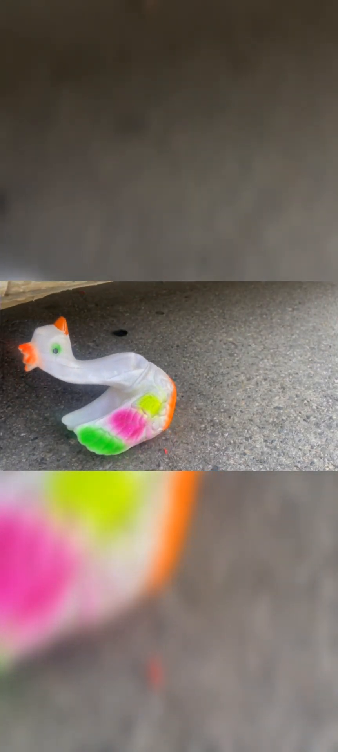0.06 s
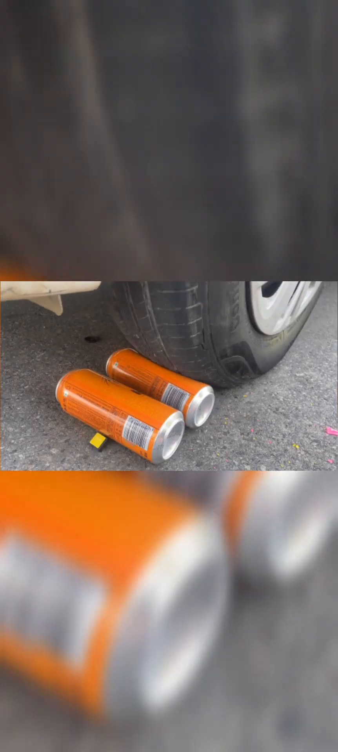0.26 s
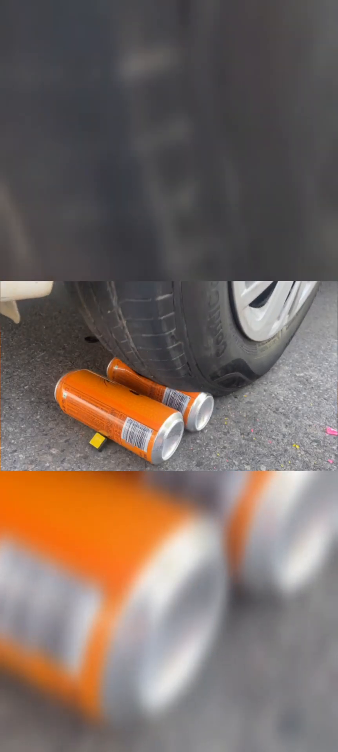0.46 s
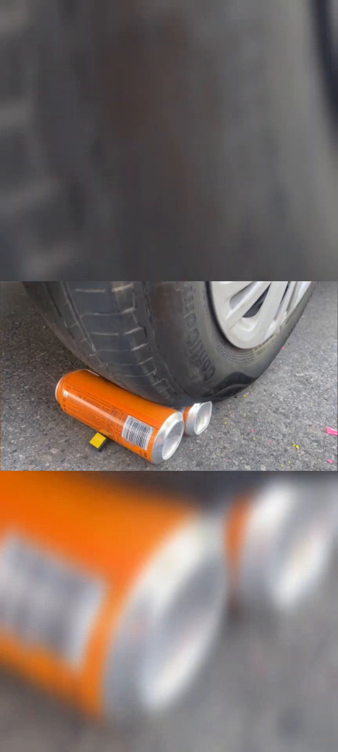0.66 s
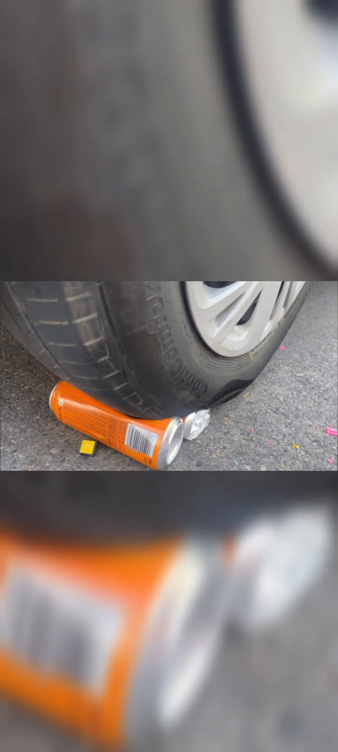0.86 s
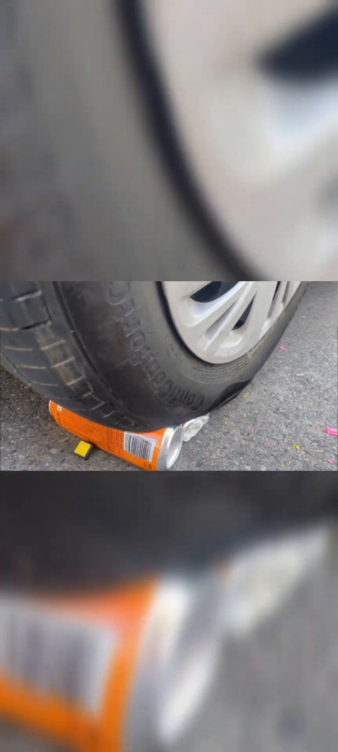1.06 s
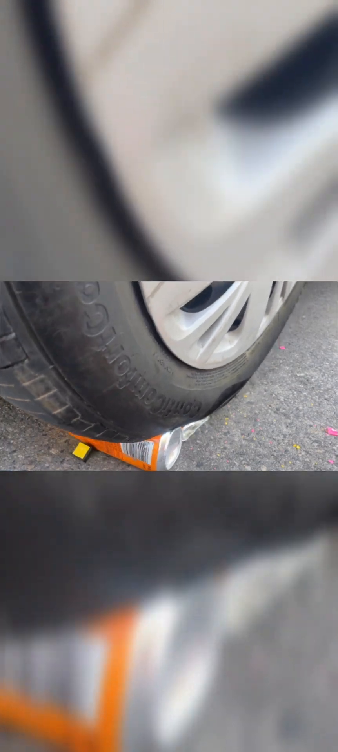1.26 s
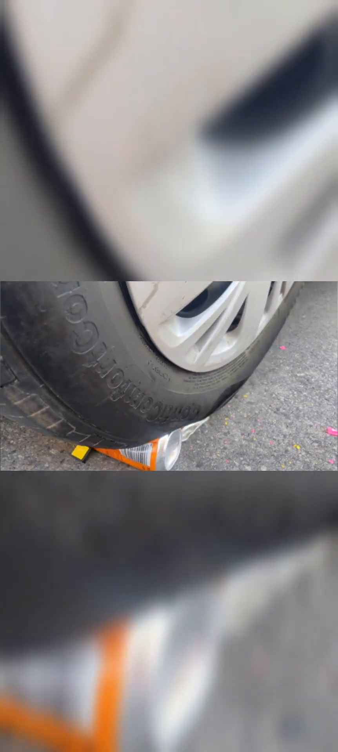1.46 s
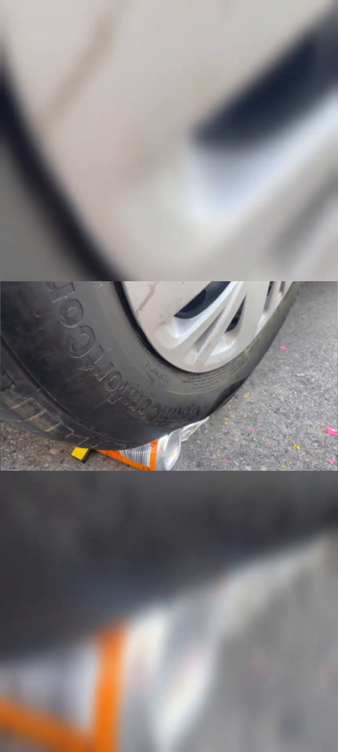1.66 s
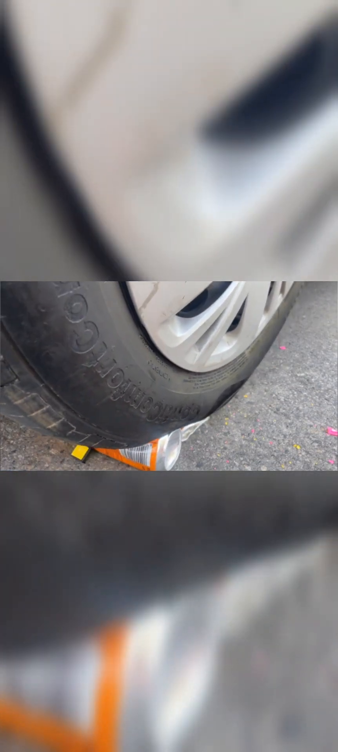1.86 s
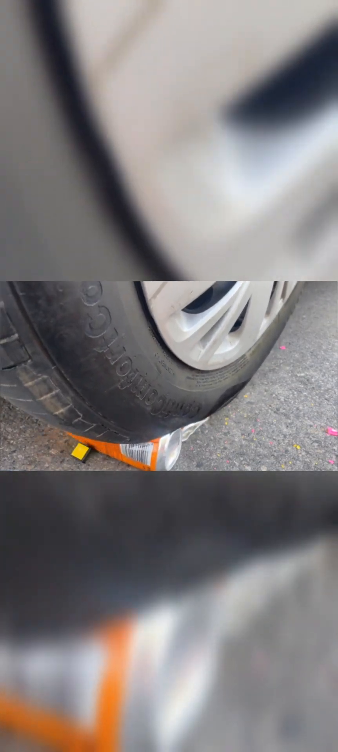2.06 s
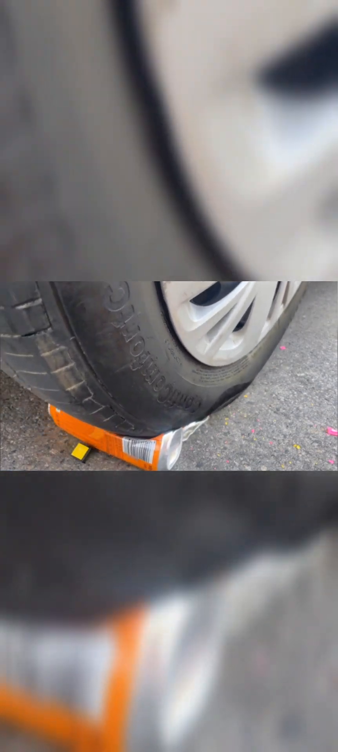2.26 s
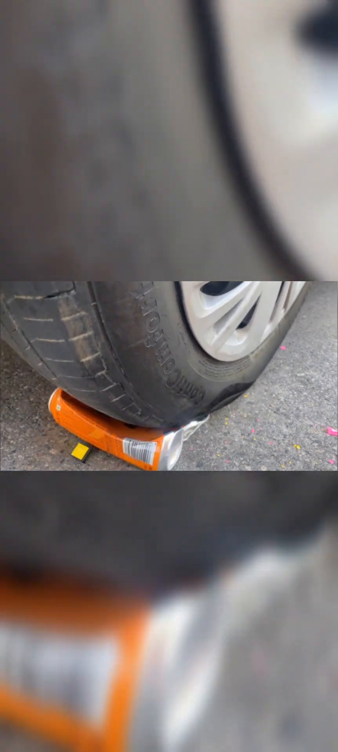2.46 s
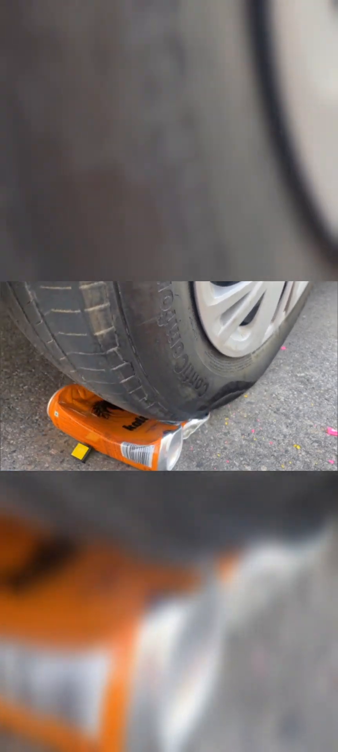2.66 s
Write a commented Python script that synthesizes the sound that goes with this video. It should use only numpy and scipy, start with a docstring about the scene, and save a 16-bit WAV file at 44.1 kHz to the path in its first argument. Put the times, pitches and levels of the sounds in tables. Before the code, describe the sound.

Close up outdoors on asphalt, thin metal cans snap and crinkle as a tyre rolls on, nearly fall silent over a low idling engine, then crunch again with bright pings as it rolls back.

```python
"""Sharp snaps and crunches of aluminium, with fine crinkling between them: a car creeps over two empty
cans on asphalt, its engine idling, the microphone close by. Runs of noise-like slips ring the modes of
the dented cans; single panels pop and stiff creases ping. The tyre thumps dully as soft pushes ring its
modes. Two wandering sines make the idle, over coloured noise for exhaust rumble and open air; a faint
tail of dying noise is the echo from car body and yard."""
import sys
import numpy as np
from scipy import signal
from scipy.fft import rfft, irfft
from scipy.io import wavfile

SR = 44100
rng = np.random.default_rng(int(sys.argv[2]) if len(sys.argv) > 2 else 0)


def unload_audio(sound):
    """Save the sound as a 16-bit wav file, at the path given as the first command line argument."""
    columns = np.transpose(np.atleast_2d(sound))
    # keep every value between -1 and 1, then stretch to whole-number steps
    steps = np.round(np.clip(columns, -1, 1) * 32767)
    wavfile.write(sys.argv[1], SR, steps.astype(np.int16))


N = 121275
LEAD_S = 0.015  # a run of slips starts this long before its main onset
SHEET_DB = -26  # ring of the crumpled sheet against the direct click


def amp(db):
    """Decibels to gain."""
    return 10 ** (np.asarray(db) / 20)


def unit(x):
    """Scales to an rms of one."""
    return x / np.sqrt(np.mean(x ** 2) + 1e-20)


def read(points, hz):
    """Reads a table on a log-frequency axis."""
    f, value = np.transpose(points)
    return np.interp(np.log(hz + 1), np.log(f + 1), value)


def add(mix, s, sound):
    """Mixes a sound in at a time in seconds."""
    part = mix[..., round(s * SR):][..., :sound.shape[-1]]
    part += sound[..., :part.shape[-1]]


def convolve(x, response):
    """Convolves along time and keeps the length."""
    full = signal.fftconvolve(np.atleast_2d(x), np.atleast_2d(response), axes=1)
    return full[:, :x.shape[-1]]


def causal(points, size=2048):
    """Minimum-phase impulse response: a given colour with no sound ahead of its onset."""
    hz = abs(np.fft.fftfreq(size, 1 / SR))
    log_gain = np.log(amp(read(points, hz)))
    return np.fft.ifft(np.exp(np.conj(signal.hilbert(log_gain)))).real


def pair(size, shape=1):
    """Left and right noise under one envelope: alike in the bass, partly different higher up."""
    apart, apart_above_hz = 0.38, 650  # gain of the left-right difference, and where it begins
    both, side = rng.standard_normal((2, size)) * shape
    high_pass = signal.butter(1, apart_above_hz, "high", fs=SR, output="sos")
    side = apart * signal.sosfilt(high_pass, side)
    return unit(np.array([both + side, both - side]))


def dying(noise, t60, size=128):
    """Lets each band of a noise die at its own speed."""
    hz, t, bands = signal.stft(noise, SR, nperseg=size)
    fade = amp(-60 * t / read(t60, hz)[:, None])
    return signal.istft(bands * fade, SR, nperseg=size)[1][:, :noise.shape[1]]


def engine():
    """A slightly unsteady idle: sines at multiples of a wandering firing rate, over rumble and open air."""
    # engine orders [multiple of the firing rate, level/dB]
    orders = [(2, -41), (3, -54.5)]
    # colour of exhaust rumble and outdoor air [f/Hz, level/dB]
    air_colour = [(20, -13.5), (45, -5), (80, 7), (125, -2), (300, -20), (700, -31.5), (5000, -56.5),
                  (16000, -61.5)]
    firing_hz, idle_wander = 40.3, 0.018  # mean rate; rms wander as a share of it
    air_db = -44  # rms
    t = np.arange(N) / SR
    wander = unit(sum(np.sin(2 * np.pi * (f * t + rng.random())) for f in np.geomspace(.7, 12, 20)))
    turns = np.cumsum(firing_hz * (1 + idle_wander * wander)) / SR
    hum = sum(amp(db) * np.sin(2 * np.pi * (order * turns + rng.random())) for order, db in orders)
    air = unit(convolve(pair(N), causal(air_colour, size=8192)))
    return hum + amp(air_db) * air


def yard(x):
    """Faint, diffuse echo from car body and yard: a noise tail whose treble dies sooner."""
    # decay of the echo [f/Hz, t60/s]
    yard_t60 = [(200, 0.43), (12000, 0.069)]
    yard_db = -26
    tail = dying(rng.standard_normal((2, SR // 2)), yard_t60)
    return amp(yard_db) * convolve(x, tail / np.linalg.norm(tail[0]))


def tyre():
    """Soft pushes ring the modes of tyre and wheel; the air in the tyre hums from a set time."""
    # the tyre drops onto a collapsing can [t/s, level/dB, push length/s]
    thumps = [(0.807, -25.5, 0.0019), (0.84, -18.5, 0.0037), (1.747, -24, 0.0049), (1.756, -25, 0.00365),
              (1.765, -20.5, 0.0052)]
    # modes of tyre and wheel [f/Hz, level/dB, t60/s]
    tyre_modes = [(96.2, 1.5, 0.13), (175, -0.5, 0.16), (204.7, 10.5, 0.05), (285.6, -4.5, 0.2)]
    low_hz = 60  # the tyre radiates little below this
    cavity_s, cavity_hz, cavity_db, cavity_t60 = 0.93, 243, -44.5, 2.26  # onset, pitch, level, decay in s
    t, pushes = np.arange(N) / SR, np.zeros(N)
    for s, db, length in thumps:
        push = np.sin(np.pi * np.arange(0, length, 1 / SR) / length)
        add(pushes, s, amp(db) * push / push.sum())
    ring = sum(amp(db - 60 * t / t60) * np.cos(2 * np.pi * hz * t) for hz, db, t60 in tyre_modes)
    high_pass = signal.butter(2, low_hz, "high", fs=SR, output="sos")
    out = signal.sosfilt(high_pass, convolve(pushes, ring))
    cavity = amp(cavity_db - 60 * t / cavity_t60) * np.sin(2 * np.pi * cavity_hz * t)
    add(out, cavity_s, cavity)
    return out


def can_response(sheet_db, modes_db, size=6000):
    """Direct click, dense ring of the sheet and the can's modes, randomly retuned at every call."""
    # modes of a dented can [f/Hz, level/dB, t60/s]
    can_modes = [(330.2, -6.5, 0.069), (491, -13.5, 0.039), (725.7, 0.5, 0.068), (902, -15, 0.11),
                 (1115, -10.5, 0.04), (1444, -1, 0.02), (1613, -9.5, 0.076), (2440, -21, 0.095)]
    # decay of the crumpled sheet's dense ring [f/Hz, t60/s]
    sheet_t60 = [(300, 0.082), (3000, 0.064), (14000, 0.031)]
    detune = 0.018  # spread of a mode's pitch, as a share of it
    t = np.arange(size) / SR
    out = amp(sheet_db) * dying(pair(size), sheet_t60)
    for (hz, db, t60), dent in zip(can_modes, rng.standard_normal(len(can_modes))):
        mode_hz = hz * (1 + detune * dent)
        out += amp(modes_db + db - 60 * t / t60) * np.cos(2 * np.pi * mode_hz * t)
    out[:, 0] += 1  # direct click
    return out


def dented(x, size=4096):
    """Rings the can in overlapping stretches, each tuned anew, so its resonances shift as it deforms."""
    modes_db = -36
    out, window = np.zeros((2, N)), signal.get_window("hann", size)
    padded = np.pad(x, (0, size))
    for at in range(0, N, size // 2):
        part = padded[at:at + size] * window
        add(out, at / SR, signal.fftconvolve(part[None], can_response(SHEET_DB, modes_db), axes=1))
    return out


def crinkle(count=28, size=1024):
    """Clumps of tiny slips, each ringing one small facet of the wall and, through it, the can."""
    # fine crinkling and scraping as the cans are dragged [t/s, level/dB]
    crinkle_levels = [(.12, -60.5), (.132, -26.5), (.21, -35), (.265, -44), (.42, -28.5), (.47, -29.5),
                      (.73, -40.5), (.87, -33.5), (.945, -51), (1, -44), (1.42, -58.5), (1.58, -84.5),
                      (1.735, -81), (1.746, -52), (1.785, -70), (1.825, -56), (1.87, -70), (2, -61),
                      (2.17, -38.5), (2.26, -47.5), (2.37, -34), (2.42, -49), (2.465, -41.5),
                      (2.485, -25.5), (2.525, -30.5), (2.56, -37.5), (2.75, -58)]
    # colour of the crinkling [f/Hz, level/dB]
    crinkle_colour = [(60, -7.5), (260, 12.5), (520, -2), (820, 7), (2000, -3), (5000, -8.5),
                      (12500, -24.5), (15000, -28)]
    slips_per_s, spread_db = 7000, 4.5  # over all facets; scale of the random boost of a slip
    clump_db, clump_hz = 5, 68.7  # rms swing of the clumps, and their fastest rate
    low_hz, high_hz, decay_cycles = 378, 13660, 2.2  # pitch range of the facets; decay to 1/e
    t, facets = np.arange(N) / SR, np.zeros(N)
    low_pass = signal.butter(2, clump_hz, fs=SR, output="sos")
    clumps = amp(clump_db * unit(signal.sosfilt(low_pass, rng.standard_normal(N))))
    steps = (np.arange(count) + rng.random(count)) / count
    for hz in low_hz * (high_hz / low_hz) ** steps:
        cycles = hz * t[:size]
        ring = np.cos(2 * np.pi * cycles) * np.exp(-cycles / decay_cycles) * hz / SR
        slips = (rng.random(N) < slips_per_s / count / SR) * clumps
        at = np.flatnonzero(slips)
        slips[at] *= amp(-spread_db * np.log(np.maximum(rng.random(len(at)), .03)))  # rare loud slips
        facets += signal.oaconvolve(slips, ring)[:N]
    out = convolve(dented(facets), causal(crinkle_colour))
    return unit(out) * amp(np.interp(t, *np.transpose(crinkle_levels)))


def slip_run(length_ms, size=6000):
    """A run of slips rings the can; a few faint ones lead up to it. It begins LEAD_S early."""
    # colour of one slip of the metal [f/Hz, level/dB]
    slip_colour = [(50, -40.5), (140, -2.5), (300, 5.5), (560, 8), (740, 14.5), (1800, 3), (4500, 2.5),
                   (6500, 2), (12000, -5.5), (15500, -21.5)]
    rise_share, decay_shape = 0.1, 1.08  # longer runs also build up more slowly; exponent of the decay
    lead_db = -23.5  # the metal starts to crackle just before it folds
    spread_db, modes_db = 6, -40
    snap_ms = 0.9  # runs shorter than this are mostly one clean snap
    progress = (np.arange(size) / SR - LEAD_S) * 1000 / length_ms  # in run lengths from the onset
    after = np.maximum(progress, 0)
    run = np.minimum(after / rise_share, 1) * np.exp(-after ** decay_shape)
    run += amp(lead_db) * np.exp(-abs(progress))
    slips = pair(size, run * amp(spread_db * rng.standard_normal(size)))
    slips[:, round(LEAD_S * SR)] += np.sqrt(size) * snap_ms / length_ms
    return convolve(convolve(slips, can_response(SHEET_DB, modes_db)), causal(slip_colour))


def tick():
    """One small crease gives way in a short run of slips; peak of one."""
    sound = slip_run(length_ms=2.5)
    return sound / abs(sound).max()


def ticks():
    """Small creases tick between the buckles."""
    # light ticks [t/s, peak level/dB]
    tick_times = [(0.336, -16), (0.365, -17), (0.881, -23.5), (0.998, -16), (1.051, -19), (1.1758, -13.5),
                  (1.2561, -16), (1.388, -27), (1.978, -37), (2.139, -20.5), (2.234, -26), (2.507, -20.5),
                  (2.287, -20)]
    out = np.zeros((2, N))
    for s, db in tick_times:
        add(out, s - LEAD_S, amp(db) * tick())
    return out


def pings(size=1500):
    """Stiff creases snap with a bright ping: a narrow cluster of sines that swells and dies quickly."""
    # bright pings [t/s, level/dB]
    ping_times = [(1.299, -10), (1.329, -2.5), (2.2876, -10.5), (2.474, -1)]
    centre_hz, width_hz, swell_s = 6040, 2800, 0.0003
    out, t = np.zeros(N), np.arange(size) / SR
    for s, db in ping_times:
        hz = centre_hz + width_hz * (rng.random((6, 1)) - .5)
        cluster = np.sin(2 * np.pi * hz * t).mean(0)
        envelope = t / swell_s * np.exp(1 - t / swell_s)
        add(out, s, amp(db) * cluster * envelope)
    return out


def pops():
    """A panel flips through with a tick and a hollow ring, its pitch sinking as it settles."""
    # panels of the wall flipping through [t/s, level/dB, settled f/Hz]
    panels = [(0.2835, -9, 745), (0.407, -8.5, 650), (0.38, -17, 312), (0.489, -16, 710), (2.44, -25, 720)]
    glide, settle_s, t60 = 0.14, 0.0051, 0.088  # initial rise as a share of pitch; settling and decay in s
    tick_db = -3  # tick against ring
    out, t = np.zeros((2, N)), np.arange(SR // 2) / SR
    for s, db, hz in panels:
        turns = np.cumsum(hz * (1 + glide * np.exp(-t / settle_s))) / SR
        add(out, s, amp(db - 60 * t / t60) * np.sin(2 * np.pi * turns))
        add(out, s - LEAD_S, amp(db + tick_db) * tick())
    return out


def buckle(length_ms, levels_db, count=2):
    """A stretch of wall folds in a run of slips, each band trimmed towards its level over 10 ms."""
    # low, body, crack and treble bands [from f/Hz, to f/Hz]
    bands = [(200, 550), (550, 1400), (1400, 4200), (4200, 16000)]
    sound = slip_run(length_ms)
    size = sound.shape[1]
    hz = np.fft.rfftfreq(size, 1 / SR)
    for _ in range(count):
        power = (abs(rfft(sound)) ** 2).mean(0) * 2 / size / (SR / 100)  # energy spread over 10 ms
        trim = []
        for (low, high), db in zip(bands, levels_db):
            band_power = power[(hz >= low) & (hz < high)].sum()
            trim.append((np.sqrt(low * high), db - 10 * np.log10(band_power)))
        sound = convolve(sound, causal(trim))
    return sound


def buckles():
    """All the snaps and crunches of the two cans as their walls buckle."""
    # buckles of the can wall
    # [t/s, length/ms, low level/dB, body level/dB, crack level/dB, treble level/dB]
    folds = [(0.208, 12, -30.5, -27.5, -26, -40.5), (0.2396, 1.3, -45, -25, -20.5, -43),
             (0.2912, 6.1, -45, -13.5, -19, -27.5), (0.3031, 5.7, -29.5, -17, -17.5, -34.5),
             (0.3515, 0.74, -31.5, -28, -20, -30), (0.385, 2.8, -20.5, -19, -19, -28.5),
             (0.4056, 9.7, -27, -14.5, -20.5, -24), (0.4182, 2.8, -39, -18, -15, -35.5),
             (0.371, 3.4, -22.5, -26, -43, -48), (0.567, 1.9, -36, -24.5, -23.5, -47),
             (0.4953, 4.1, -23, -26.5, -28, -31), (0.528, 1.9, -29.5, -24.5, -32, -31.5),
             (0.5605, 1.8, -38, -32, -28.5, -29.5), (0.5746, 2.1, -24.5, -21.5, -21.5, -29.5),
             (0.598, 3.4, -54, -31.5, -24, -20), (0.6068, 3, -33.5, -23.5, -19, -31.5),
             (0.616, 9.9, -20.5, -18, -25.5, -16.5), (0.6315, 2.1, -21.5, -26, -18, -26.5),
             (0.6811, 5.4, -20, -19, -21.5, -24), (0.7497, 3.1, -34.5, -26, -26.5, -33),
             (0.7938, 0.82, -22, -25.5, -34.5, -37.5), (0.8109, 4, -14, -16, -22.5, -31.5),
             (0.8385, 6.2, -15.5, -14, -14, -23.5), (0.9183, 9.6, -40.5, -43, -37, -33),
             (0.965, 1.9, -59, -28, -23, -27), (0.975, 4.2, -25, -29, -24.5, -38),
             (0.9902, 0.79, -33, -34.5, -26, -41), (1.0354, 0.84, -49, -31.5, -33.5, -29),
             (1.086, 8.2, -26.5, -29, -32.5, -43), (1.0964, 8.5, -37, -28, -28.5, -29.5),
             (1.1488, 1.9, -41.5, -28.5, -37, -46), (1.1983, 1.5, -42, -34, -27, -27),
             (1.2336, 3.1, -38.5, -24.5, -30, -33.5), (1.2987, 0.91, -43.5, -32.5, -22, -23.5),
             (1.329, 0.75, -48.5, -39, -43, -32), (1.3733, 5.4, -39.5, -35, -32.5, -26.5),
             (1.4592, 4.1, -39.5, -29.0, -24, -23), (1.472, 0.79, -39, -28, -22, -20),
             (2.0087, 0.99, -46.5, -29.5, -24, -28), (2.0677, 4.2, -36, -28.5, -31.5, -49.5),
             (2.1063, 0.54, -53, -47, -35.5, -27), (2.208, 6.1, -27, -16.5, -24, -23),
             (2.2145, 2.9, -32, -27.5, -22.5, -29), (2.2975, 2, -61, -28.5, -26.5, -24.5),
             (2.331, 3.7, -33.5, -22.5, -14, -20), (2.353, 7.8, -46, -45, -18.5, -24.5),
             (2.409, 3.8, -57, -37, -29.5, -35.5), (2.558, 3.3, -81, -39, -25.5, -37.5),
             (2.6592, 2.9, -45, -34.5, -24, -29), (2.7291, 2.5, -52, -31.5, -37, -53)]
    out = np.zeros((2, N))
    for s, length_ms, *levels_db in folds:
        add(out, s - LEAD_S, buckle(length_ms, levels_db))
    return out


def ports(x):
    """The cans reach the two microphone ports unequally loud and, above the bass, out of step."""
    # phase by which left leads, before its fade-out below 1500 Hz [f/Hz, phase/rad]
    port_phase = [(500, 0.5), (2900, 0.72), (5600, 1.13), (7840, -3), (11000, -6.5), (14000, -9)]
    # how the cans lean to one side [f/Hz, left-right level/dB]
    lean = [(300, 2), (700, -2.5), (2400, 4.5), (9000, 0.5)]
    hz = np.fft.rfftfreq(2 * N, 1 / SR)
    phase = read(port_phase, hz) * np.minimum(hz / 1500, 1) ** 2
    left = amp(read(lean, hz) / 2) * np.exp(.5j * phase)
    return irfft(rfft(x, 2 * N) * np.array([left, 1 / left]))[:, :N]


def scene():
    """Engine, tyre and cans in the yard."""
    thumps = tyre()
    cans = ports(crinkle() + ticks() + pings() + pops() + buckles())
    close = cans + thumps
    return engine() + yard(close) + close


def record(dry):
    """Microphone colour, soft overload and the band limit."""
    # colour of the microphone port [f/Hz, level/dB]
    mic_colour = [(6000, -0.5), (7300, 2.5), (8200, -3.5), (9300, 3)]
    ceiling, cut_hz = 0.85, 16300
    coloured = convolve(dry, causal(mic_colour))
    limited = coloured / (1 + (coloured / ceiling) ** 6) ** (1 / 6)
    low_pass = signal.firwin(255, cut_hz, window=("kaiser", 9), fs=SR)
    return signal.oaconvolve(limited, low_pass[None], "same")


dry = scene()
out = record(dry)
unload_audio(out)
```